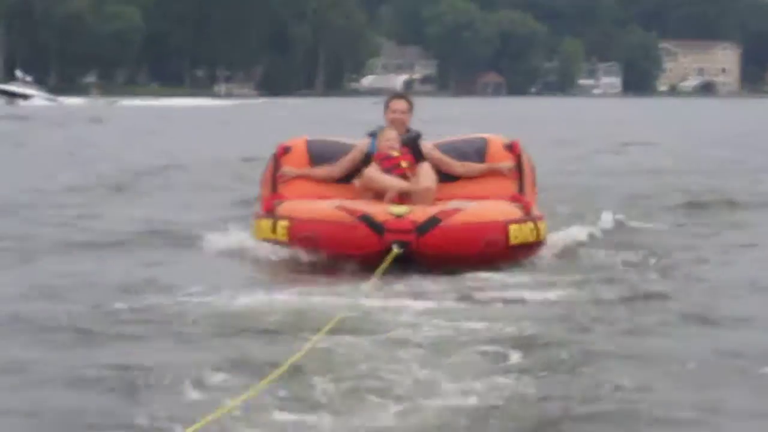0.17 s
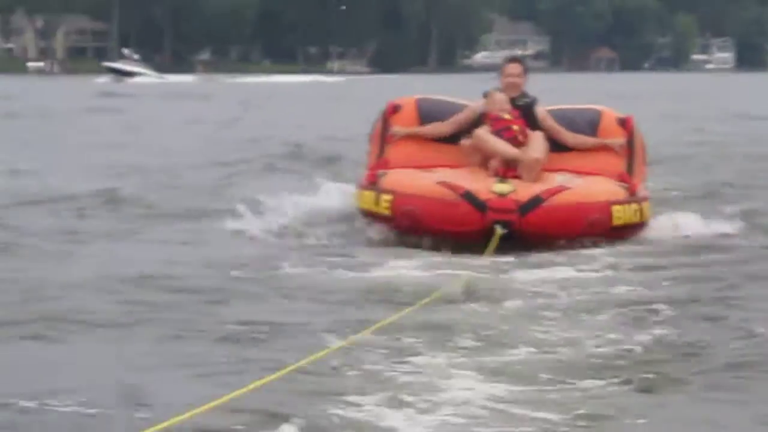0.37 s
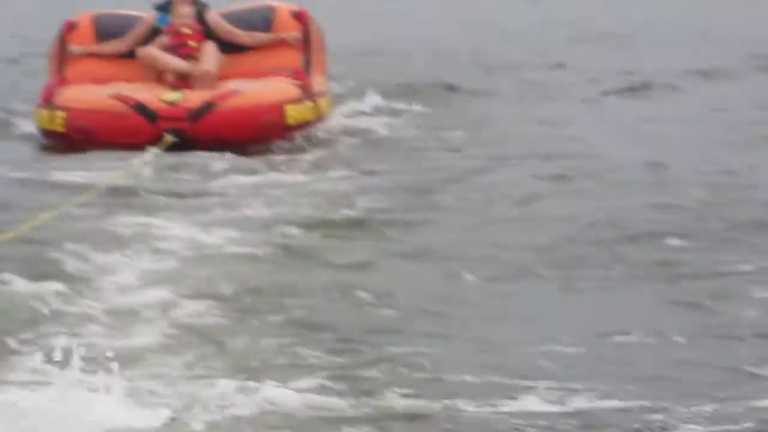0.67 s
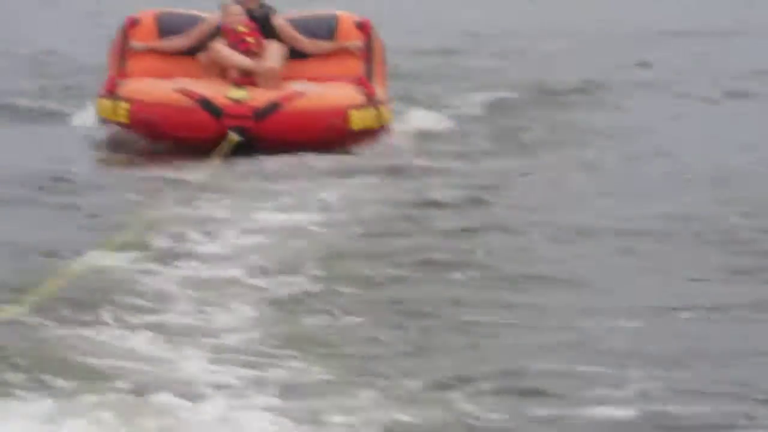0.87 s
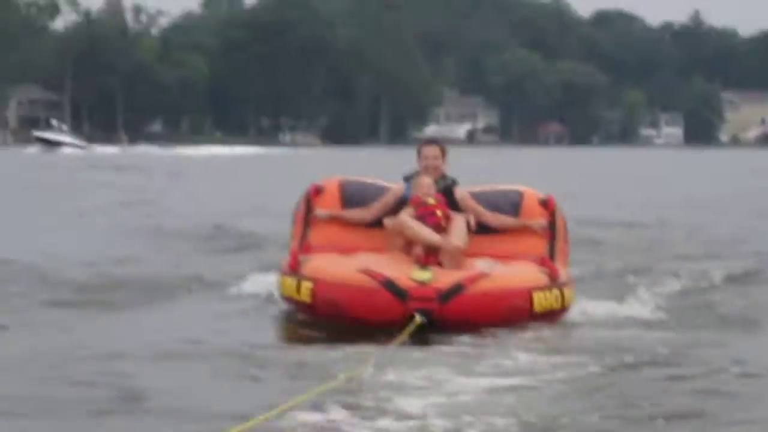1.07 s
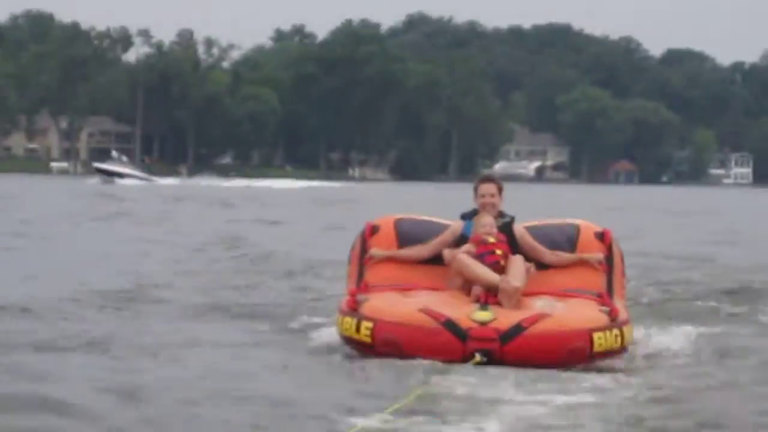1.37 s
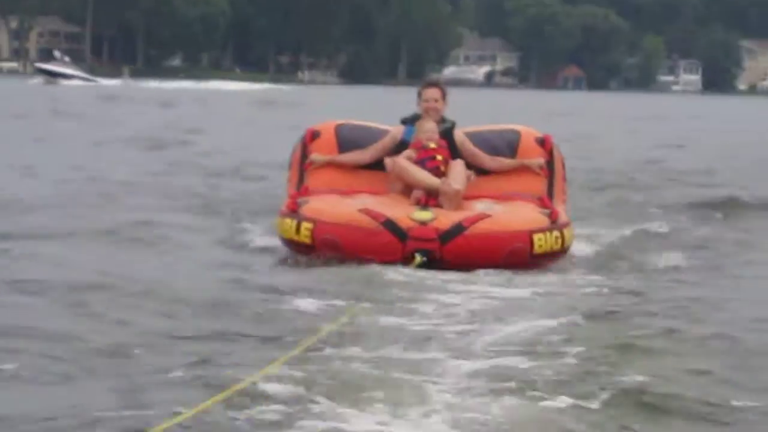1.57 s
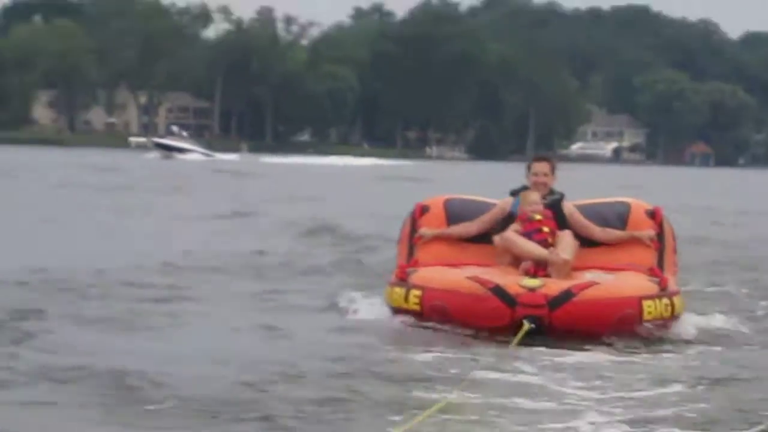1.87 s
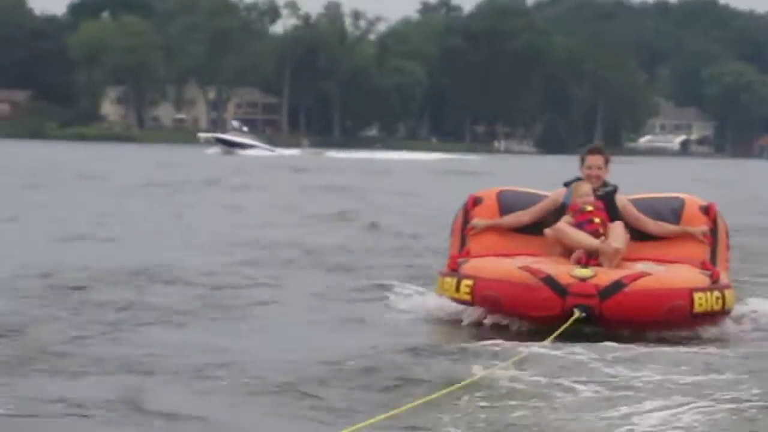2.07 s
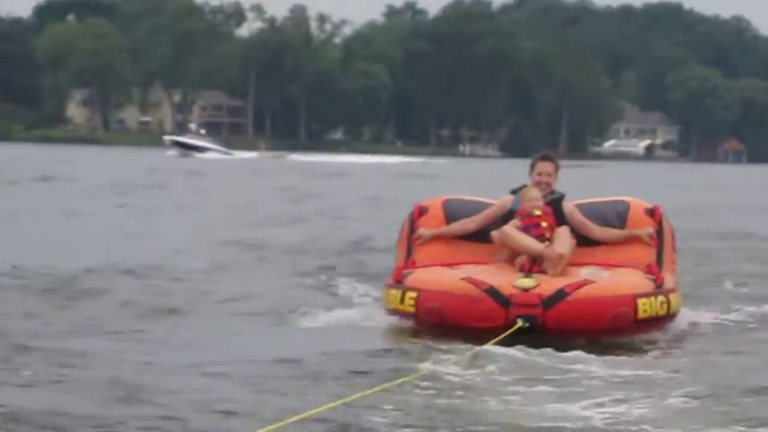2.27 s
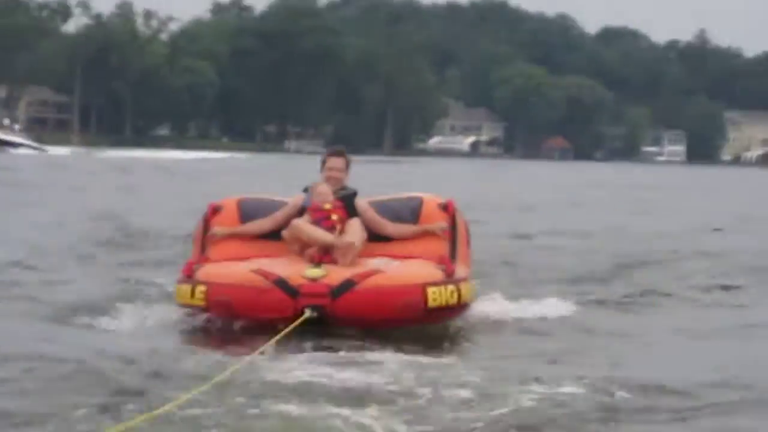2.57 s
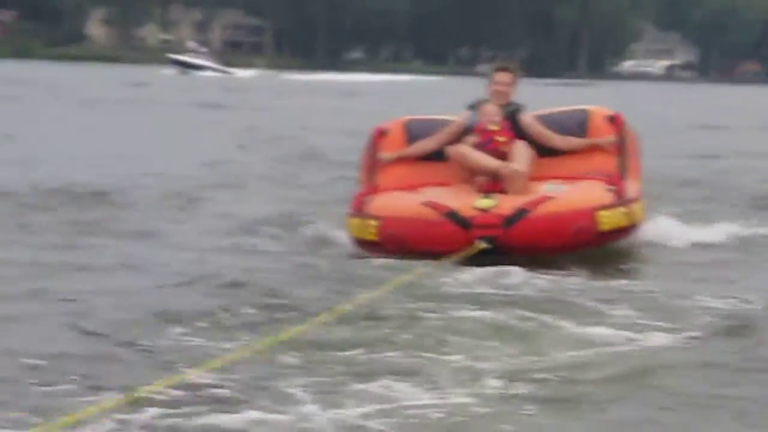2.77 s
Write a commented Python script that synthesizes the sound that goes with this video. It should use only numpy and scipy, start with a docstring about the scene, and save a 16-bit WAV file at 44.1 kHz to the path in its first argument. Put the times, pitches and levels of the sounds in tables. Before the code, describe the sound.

Close to the stern of a motorboat towing an inflatable across a lake, the engine holds a low, even drone. Water bubbles and splashes behind it, surging in the middle and once more toward the end.

```python
"""An eight-cylinder engine drones through its wet exhaust over churning water: the stern of a motorboat
towing an inflatable across a lake at steady speed. Unequal cylinders give the drone a lope, high
overtones add a faint whine, exhaust gas burbles through the water and the hull booms along.
The wake bubbles, gulps and throws hissing spray, swelling once in the middle and again near the end."""
import sys
import numpy as np
from scipy import signal
from scipy.io import wavfile

SR = 44100
rng = np.random.default_rng(int(sys.argv[2]) if len(sys.argv) > 2 else 0)


def wrap_up_sound(samples):
    """Save the sound to the file named by the first command line argument, as 16-bit audio."""
    columns = np.atleast_2d(samples).T
    # keep every value between -1 and 1, then stretch to whole-number steps
    tamed = np.clip(columns, -1, 1)
    steps = np.round(tamed * 32767).astype(np.int16)
    wavfile.write(sys.argv[1], SR, steps)


N = 128772
TIME = np.arange(N) / SR


def from_db(db):
    """Decibels to gain."""
    return 10 ** (np.asarray(db) / 20)


def rms_one(x):
    """Scale to unit power."""
    return x / np.sqrt(np.mean(x ** 2) + 1e-20)


def in_time(rows):
    """A control curve at every sample."""
    return np.interp(TIME, *np.transpose(rows))


def drift(rate_hz):
    """Slow random motion; rms 1."""
    hop, settle = 40, 2000
    r = np.exp(-2 * np.pi * rate_hz * hop / SR)
    steps = rng.standard_normal(N // hop + settle + 2)
    slow = signal.lfilter([1], [1, -2 * r, r * r], steps)[settle:]
    return np.interp(np.arange(N) / hop, np.arange(len(slow)), rms_one(slow))


def resonate(x, hz, width_hz):
    """One resonance; a click rings at about its own height."""
    r = np.exp(-np.pi * width_hz / SR)
    return signal.lfilter([.5, 0, -.5], [1, -2 * r * np.cos(2 * np.pi * hz / SR), r * r], x + 1e-18)


def narrow_noise(hz, width_hz):
    """Noise twice through one resonance; rms 1."""
    return rms_one(resonate(resonate(rng.standard_normal(N), hz, width_hz), hz, width_hz))


def rush(colour, patchy_db, flicker_hz):
    """White noise shaped by an EQ curve in sixth-octave bands that flicker in pairs; rms 1."""
    points_hz, points_db = np.transpose(colour)
    edges = 20 * 2 ** (np.arange(59) / 6)
    white, out = rng.standard_normal((2, N)), 0
    for k, (low, high) in enumerate(zip(edges, edges[1:])):
        if k % 2 == 0:
            flicker = from_db(patchy_db * drift(flicker_hz))
        if high > points_hz[0] and low < points_hz[-1]:
            bandpass = signal.butter(2, [low, high], "band", fs=SR, output="sos")
            band_db = np.interp(np.log(low * high) / 2, np.log(points_hz), points_db)
            out = out + signal.sosfilt(bandpass, white[k % 2]) * flicker * from_db(band_db)
    return rms_one(out)


def grains(per_s, cycles, spread_db, pitches_hz):
    """Random clicks of uneven size, each ringing at one pitch and fading 60 dB over `cycles`; rms 1."""
    sizes = from_db(spread_db * np.minimum(rng.exponential(1, N), 4)) * rng.choice([-1, 1], N)
    clicks = sizes * (rng.random(N) < per_s / SR)
    pitch_index = rng.integers(0, len(pitches_hz), N)
    return rms_one(sum(resonate(clicks * (pitch_index == k), hz, np.log(1000) * hz / (np.pi * cycles))
                       for k, hz in enumerate(pitches_hz)))


def burst(start_s, rise_s):
    """An envelope that swells to 1 and dies away."""
    age = np.maximum(TIME - start_s, 0) / rise_s
    return age * np.exp(1 - np.minimum(age, 60))


# Engine revs, held almost steady: t/s, speed/rpm
ENGINE_RPM = [(0.1, 1890), (0.45, 1880), (0.6, 1886), (0.8, 1877), (1.35, 1876), (1.6, 1884), (1.75, 1873),
              (2.0, 1876), (2.2, 1872), (2.8, 1874)]


def engine_cycle():
    """Phase in radians of the firing cycle, one turn per two revolutions, wandering slightly."""
    cycle_hz = in_time(ENGINE_RPM) / 120
    wander = 1 + 0.00051 * drift(6.5)
    return 2 * np.pi * np.cumsum(cycle_hz * wander) / SR


# Fader ride of the drone: t/s, level/dB
DRONE_FADER = [(0.08, -16.5), (1.49, -16.5), (1.64, -19.5), (1.68, -17.5), (2.15, -16.5), (2.86, -17.5)]
# Exhaust partials, the eighth being the firing rate: multiple of the cycle rate, relative level/dB
DRONE_PARTIALS = [(4, -41), (6, -13.5), (7, -16), (8, 0.87), (9, -26), (10, -17.5), (11, -24), (12, -23),
                  (13, -33.5), (14, -34.5), (15, -38.5), (17, -46), (20, -38.5), (21, -34.5), (23, -32),
                  (32, -38.5), (50, -39.5)]


def exhaust_drone(cycle):
    """A firm firing tone. Unequal cylinders mostly shift its timing, adding sidebands mirrored in phase."""
    cylinders, firing_wobble_db = 8, -0.1
    out, phases = 0, 2 * np.pi * rng.random(64)
    for order, db in DRONE_PARTIALS:
        offset = round(order) - cylinders
        wobble = drift(5.7) + 1j * drift(3.4)
        if offset == 0:
            phase, strength = 0, from_db(firing_wobble_db * wobble.real)
        else:
            phase = np.pi / 2 + np.sign(offset) * phases[abs(offset)]
            strength = 1 + .15 * order / 20 * wobble  # higher partials waver more
        out = out + from_db(db) * np.real(strength * np.exp(1j * (order * cycle + phase)))
    return np.sqrt(2) * out * from_db(in_time(DRONE_FADER))


# Fader ride of the wake: t/s, level/dB
WAKE_FADER = [(0.05, -34), (0.13, -36.5), (0.22, -39), (0.36, -36.5), (0.58, -33.5), (0.8, -35),
              (0.93, -36.5), (0.975, -34.5), (1.04, -37), (1.42, -39), (1.55, -32), (1.66, -30.5),
              (1.86, -34), (2.15, -37), (2.42, -36.5), (2.7, -35.5), (2.82, -32), (2.92, -34.5)]
# Mid-heavy EQ of the wash: f/Hz, relative level/dB
WASH_EQ = [(200, -2.5), (380, -4.5), (520, -4), (780, 0), (1200, -2), (1700, -9), (2400, -12),
           (4000, -22.5), (8000, -25)]


def wake():
    """Churning water full of ringing bubbles."""
    wash = from_db(-0.5) * rush(WASH_EQ, patchy_db=1.6, flicker_hz=25)
    bubbles = grains(per_s=900, cycles=9.9, spread_db=3, pitches_hz=np.geomspace(604, 1980, 24))
    return (wash + from_db(-6) * bubbles) * from_db(in_time(WAKE_FADER))


# Bass-heavy EQ of the burble: f/Hz, relative level/dB
BURBLE_EQ = [(20, -20), (45, -13.5), (68, -15), (88, 3.5), (130, -1.5), (195, -8.5), (260, -7),
             (400, -13.5), (600, -25)]


def exhaust_burble(cycle):
    """Gas breaks through the water and rings the hollow pipe, louder as the wake swells."""
    wake_db = in_time(WAKE_FADER)
    swell_db = wake_db - wake_db.mean()
    gas = from_db(-31.5 + 0.49 * swell_db) * rush(BURBLE_EQ, patchy_db=1.5, flicker_hz=10)
    pipe = from_db(-46 + 0.81 * swell_db) * narrow_noise(hz=782, width_hz=38)
    throb = 1 + 0.31 * np.cos(2 * cycle)  # once per revolution
    return (gas + pipe) * throb


# Fader ride of the hull's hollow boom: t/s, level/dB
BOOM_FADER = [(0.05, -34.5), (0.27, -46.5), (0.42, -37), (0.7, -42.5), (0.9, -37), (1.05, -52),
              (1.22, -43.5), (1.42, -37), (1.65, -39.5), (1.85, -38), (2.05, -42), (2.35, -40),
              (2.7, -38.5), (2.92, -39.5)]


def hull_boom(cycle):
    """One engine overtone and the burble around it set the hull booming."""
    overtone = from_db(1.5) * np.sqrt(2) * np.sin(18 * cycle)
    rumble = 0.52 * narrow_noise(hz=281, width_hz=24)
    return from_db(in_time(BOOM_FADER)) * (overtone + rumble)


# Fader ride of the splashing: t/s, level/dB
SPLASH_FADER = [(0.06, -41), (0.26, -45.5), (0.58, -41), (0.84, -44), (1.44, -44), (1.65, -35.5),
                (1.73, -37.5), (1.8, -35), (1.82, -38.5), (2.12, -44.5), (2.16, -43), (2.4, -45),
                (2.88, -38.5), (2.9, -41)]
# Its EQ, forward in the upper mids: f/Hz, relative level/dB
SPLASH_EQ = [(1000, -5), (2000, -2.5), (3000, 0), (4200, -2), (5500, -10), (8000, -22)]


def splash():
    """Splashing water, the body of the spray."""
    return from_db(in_time(SPLASH_FADER) - 0.5) * rush(SPLASH_EQ, patchy_db=1.0, flicker_hz=41)


# Fader ride of the hiss and patter: t/s, level/dB
DROPLET_FADER = [(0.05, -45.5), (0.15, -51.5), (0.22, -52.5), (0.52, -45.5), (0.87, -47.5), (1.01, -43.5),
                 (1.42, -44.5), (1.56, -40), (1.665, -35), (1.71, -40), (1.77, -37.5), (1.95, -42.5),
                 (2.11, -45), (2.3, -43.5), (2.42, -44.5), (2.88, -39.5)]
# Bright EQ of the hiss: f/Hz, relative level/dB
HISS_EQ = [(3000, -11), (4500, -0.5), (6000, 1.5), (8500, -1.5), (10500, -7), (13000, -16), (16000, -20)]


def droplets():
    """Thrown drops blur into a hiss, with a patter of tiny ticks inside it."""
    hiss = from_db(-0.5) * rush(HISS_EQ, patchy_db=1.1, flicker_hz=44)
    ticks = grains(per_s=3000, cycles=1.8, spread_db=5.5, pitches_hz=np.geomspace(2500, 9000, 14))
    patter = signal.sosfilt(signal.butter(2, 9500, fs=SR, output="sos"), from_db(-8) * ticks)
    return (hiss + patter) * from_db(in_time(DROPLET_FADER))


# Fader ride of the mist: t/s, level/dB
MIST_FADER = [(0.1, -53.5), (0.16, -52), (0.21, -57.5), (0.53, -50.5), (0.92, -52), (0.97, -48),
              (1.01, -54), (1.38, -60), (1.52, -57), (1.67, -51), (1.69, -54), (1.78, -61), (2.07, -61),
              (2.88, -52)]
# Its airy EQ: f/Hz, relative level/dB
MIST_EQ = [(6000, -26), (9000, 7.5), (11500, 3.5), (13500, 1), (16000, -6.5)]


def mist():
    """The finest spray sizzles at the top of the treble."""
    return from_db(in_time(MIST_FADER) + 1) * rush(MIST_EQ, patchy_db=.8, flicker_hz=44)


def spray():
    """Splash, droplets and mist thrown up by the wake, fluttering together."""
    return (splash() + droplets() + mist()) * from_db(.5 * drift(30))


# Cues for spits of spray: t/s, level/dB at the crest
SPIT_CUES = [(0.382, -41), (0.458, -37), (0.58, -40), (0.968, -48), (1.662, -34), (2.494, -41)]


def spits():
    """Short bright bursts as thrown water lands."""
    envelope = sum(from_db(db) * burst(start_s, rise_s=0.0031) for start_s, db in SPIT_CUES)
    return narrow_noise(hz=4770, width_hz=3400) * envelope


# Cues for gulps in the wake: t/s, level/dB at the peak, f/Hz at the onset
GULP_CUES = [(0.395, -26, 780), (0.497, -31, 845), (0.835, -27, 740), (0.968, -24, 1200), (0.98, -32, 790),
             (1.182, -31, 810), (1.535, -25, 950), (1.594, -24.5, 786), (1.644, -22, 740),
             (1.667, -24, 800), (1.696, -27, 845), (1.864, -25, 970), (1.929, -21, 910)]


def gulps():
    """Each large air pocket rings briefly, rising in pitch."""
    out, glide_hz_per_s = 0, 1400
    for start_s, db, hz in GULP_CUES:
        age = TIME - start_s
        turns = (hz + .5 * glide_hz_per_s * age) * age + rng.random()
        out = out + from_db(db) * burst(start_s, rise_s=0.0015) * np.sin(2 * np.pi * turns)
    return out


def scene():
    """Engine and water in the open air, in mono."""
    cycle = engine_cycle()
    boat = exhaust_drone(cycle) + exhaust_burble(cycle) + hull_boom(cycle)
    return (boat + wake() + gulps() + spray() + spits())[None]


def record(dry):
    """The sound cuts in abruptly; a steep low-pass trims the very top."""
    start_s, fade_s, cutoff_hz = .0355, 0.00034, 15750
    opened = dry * np.clip((TIME - start_s) / fade_s, 0, 1)
    return signal.sosfilt(signal.ellip(12, .1, 90, cutoff_hz, fs=SR, output="sos"), opened)


dry = scene()
out = record(dry)
wrap_up_sound(out)
```